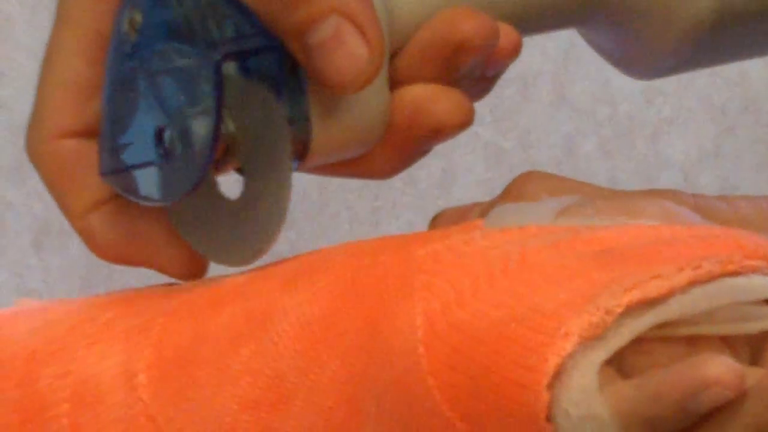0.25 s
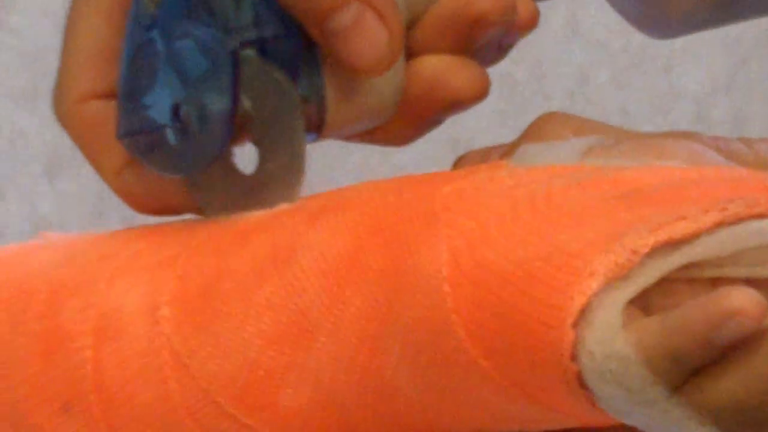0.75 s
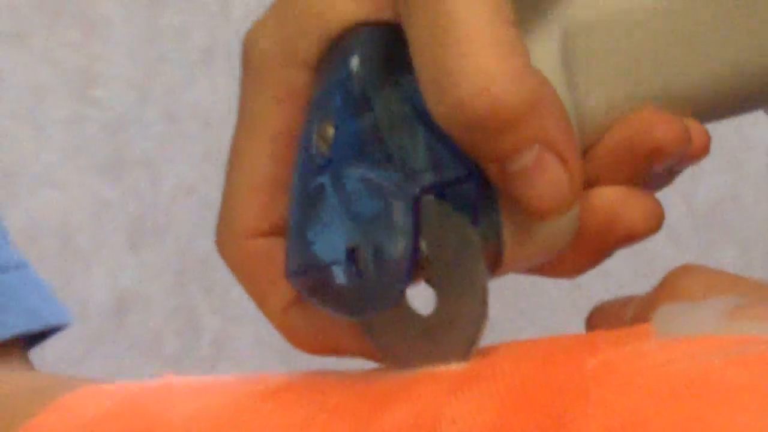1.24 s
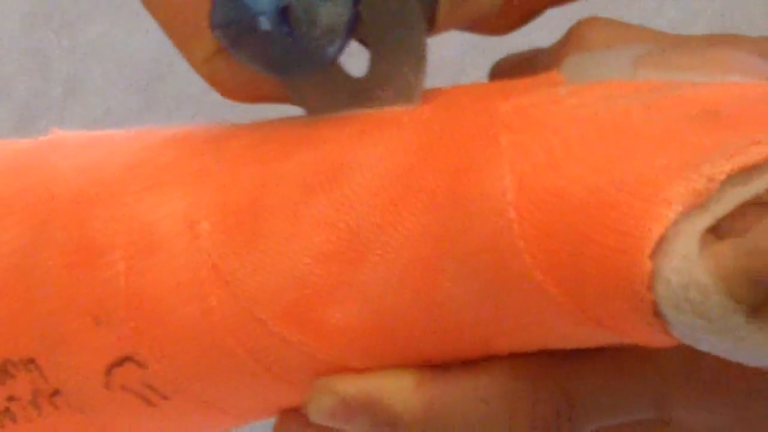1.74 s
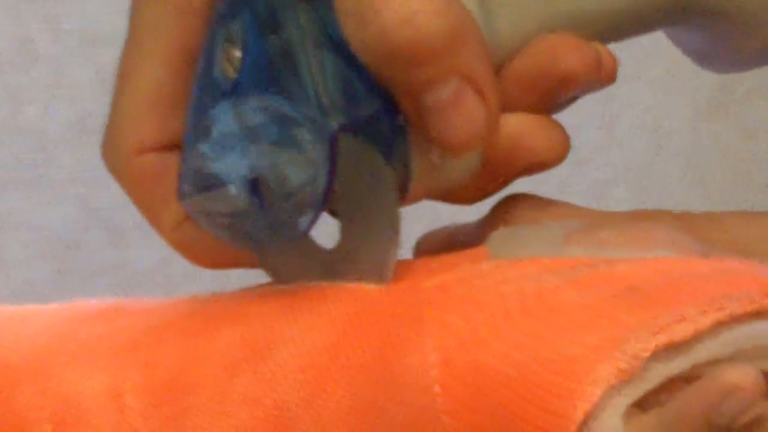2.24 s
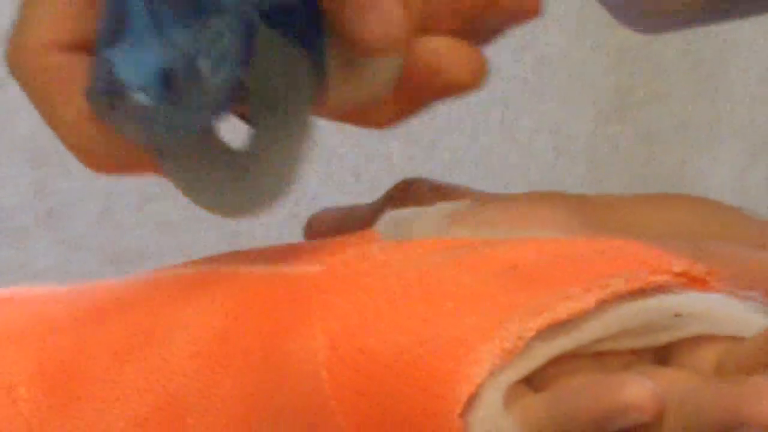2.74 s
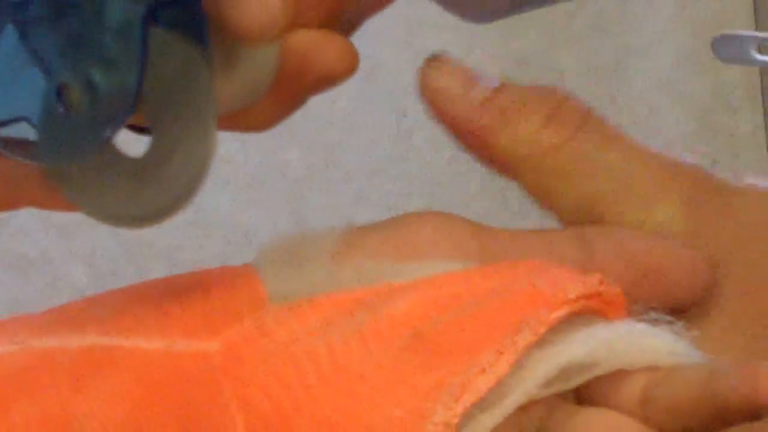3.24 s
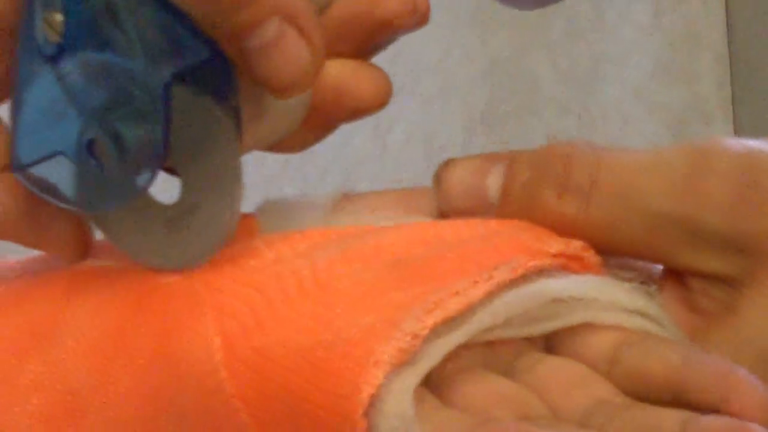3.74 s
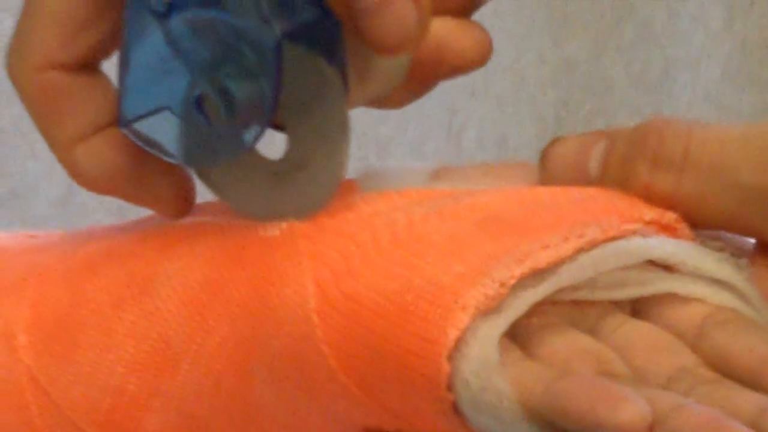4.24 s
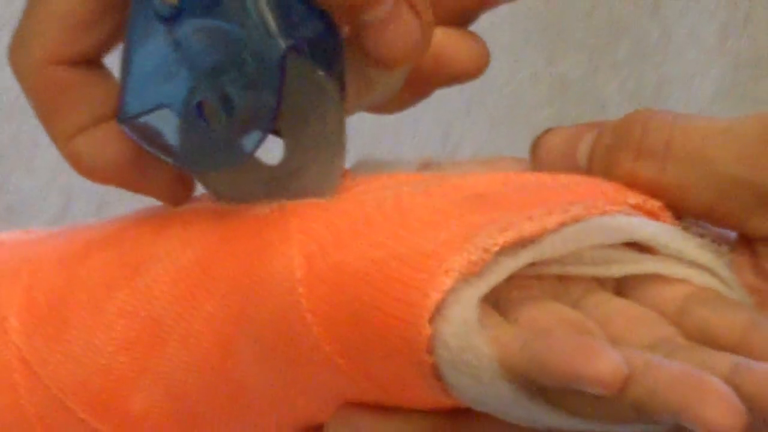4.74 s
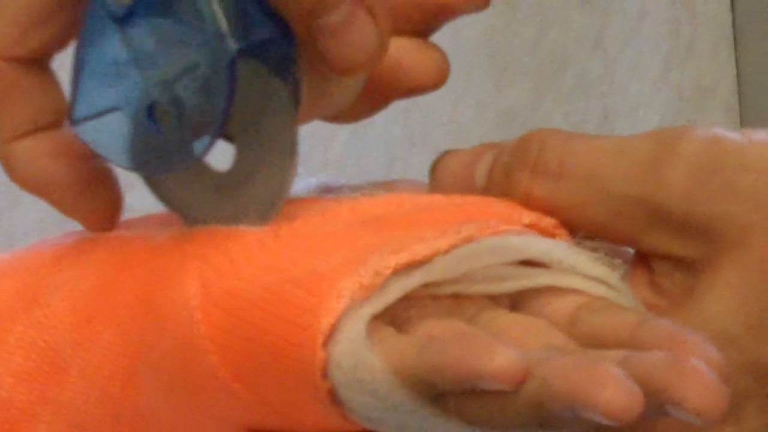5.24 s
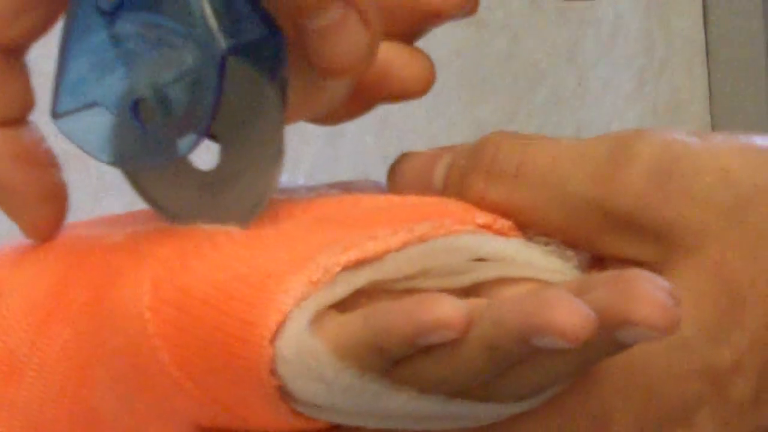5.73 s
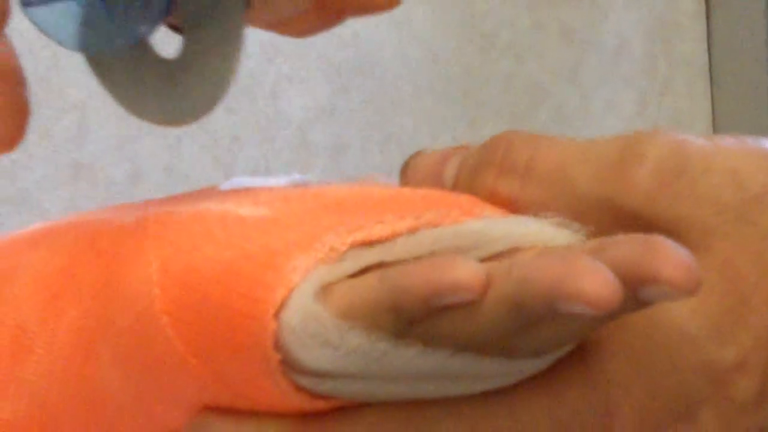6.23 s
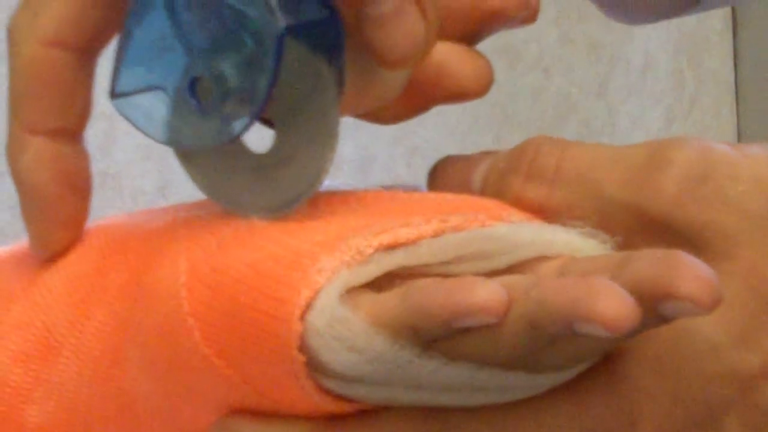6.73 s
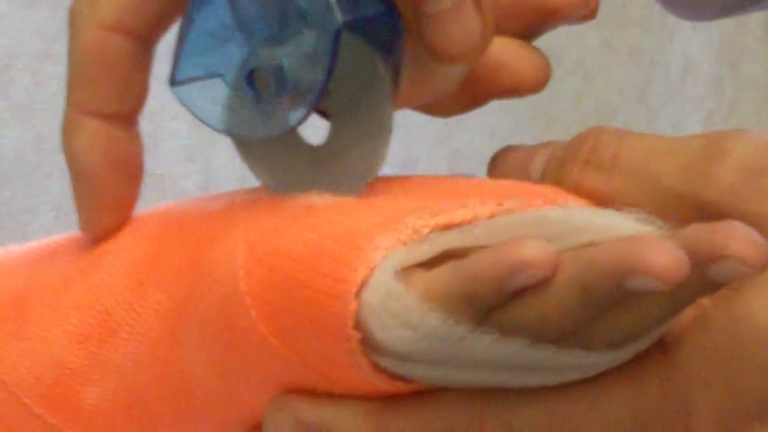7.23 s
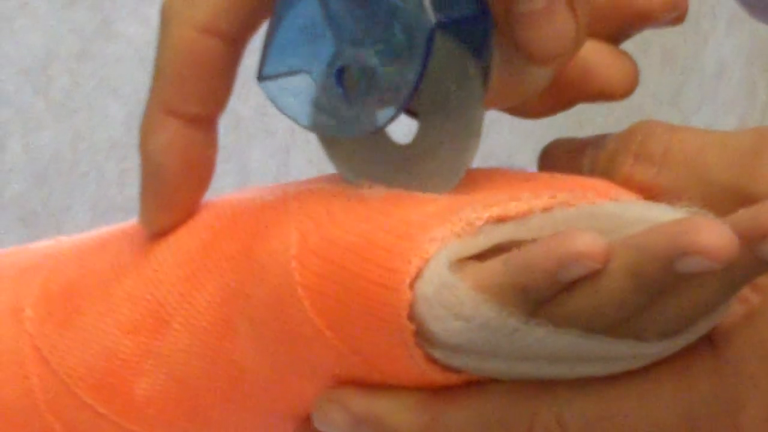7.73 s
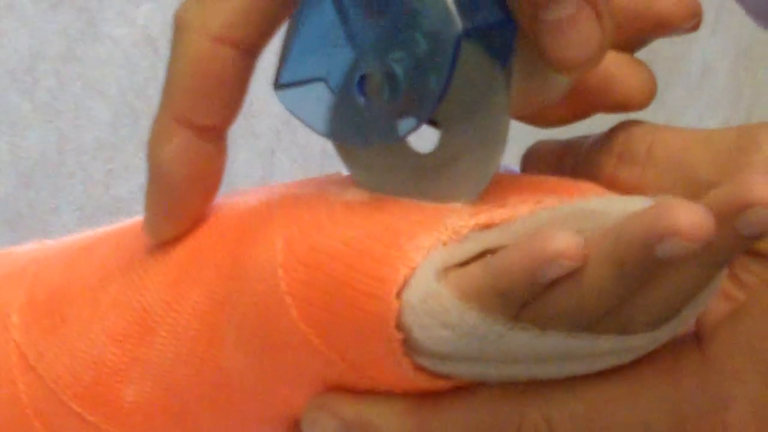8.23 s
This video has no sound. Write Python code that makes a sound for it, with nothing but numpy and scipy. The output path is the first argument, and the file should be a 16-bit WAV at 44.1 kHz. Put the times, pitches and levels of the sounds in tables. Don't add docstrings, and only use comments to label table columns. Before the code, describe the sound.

A small electric cast saw whines with a harsh nasal buzz, dipping and roughening as it bites a hard cast, vacuum air rushing underneath.

```python
import sys
import numpy as np
from scipy import signal
from scipy.io import wavfile
from scipy.ndimage import uniform_filter1d

SR = 44100
rng = np.random.default_rng(int(sys.argv[2]) if len(sys.argv) > 2 else 0)


def file_out(sig):
    cols = np.atleast_2d(sig).T
    lim = np.clip(cols, -1, 1)
    pcm = np.round(lim * 32767).astype(np.int16)
    wavfile.write(sys.argv[1], SR, pcm)


def nominal_scale(level):
    x = np.asarray(level, float) / 20
    return 10 ** x


N = 373729
MID_WHINE_DB = -39.5


def rms_one(x):
    return x / np.sqrt(np.mean(np.abs(x) ** 2) + 1e-20)


def in_time(rows):
    s, *columns = np.transpose(rows)
    return [np.interp(np.arange(N) / SR, s, c) for c in columns]


def bells(events):
    clock = np.arange(0, N + 64, 64) / SR
    coarse = 0
    for s, half_s, *more in events:
        coarse = coarse + np.outer(more, np.exp(-((clock - s) / half_s) ** 2))
    return np.array([np.interp(np.arange(N) / SR, clock, row) for row in coarse])


def drift(rate_hz):
    r = np.exp(-80 * np.pi * rate_hz / SR)
    noise = rng.standard_normal(N // 40 + 2002)
    slow = signal.lfilter([1], [1, -2 * r, r * r], noise)[2000:]
    return np.interp(np.arange(N) / 40, np.arange(len(slow)), rms_one(slow))


def highpass(x, order, hz):
    return signal.sosfilt(signal.butter(order, hz, "high", fs=SR, output="sos"), x)


def colour(sources, spectrum, low_hz, high_hz, patchy_db):
    out, together = 0, drift(10.0)
    spectrum_hz, spectrum_db = np.transpose(spectrum)
    edges = low_hz * 2 ** np.arange(0, np.log2(high_hz / low_hz), 1 / 3)
    for k, (low, high) in enumerate(zip(edges, edges[1:])):
        band = signal.sosfilt(signal.butter(2, [low, high], "band", fs=SR, output="sos"), sources[k % 2])
        level_db = np.interp(np.log(np.sqrt(low * high)), np.log(spectrum_hz), spectrum_db)
        flicker = 0.85 * together + drift(11.7) + 0.69 * drift(0.99)
        out = out + band * nominal_scale(level_db + patchy_db * flicker)
    return rms_one(out)


def partial(phase, level_db, flutter, wander_db, rate_hz):
    gain = nominal_scale(level_db + wander_db * drift(1.0)) * np.sqrt(2 / (1 + 2 * flutter ** 2))
    in_phase = (1 + flutter * drift(rate_hz)) * np.sin(phase)
    return gain * (in_phase + flutter * drift(rate_hz) * np.cos(phase))


# start_s (centre), half_s, speed_lost_hz, multiple_6_db, multiple_8_db
PUSHES = [(0.69, 0.039, 2, -6, 2), (1.38, 0.052, 1.6, 10.5, 11), (1.475, .035, 0, -7, -5),
          (1.56, 0.051, 5, 0, 10.5), (1.873, 0.046, 1.1, 5, 3), (2.0, 0.043, 1.23, -2, 1),
          (2.218, 0.059, 3.5, 2, 9), (2.3, 0.022, 0, -1, 5.5), (2.46, 0.028, 1.28, 4.5, 3),
          (2.623, 0.026, -0.4, 4, 6), (2.74, 0.067, 6, 3.5, 7), (4.69, 0.045, 0.23, 1.5, -12),
          (4.79, 0.035, 0.5, -6, -6), (4.89, 0.044, 1.5, 8, 4), (5.17, 0.042, -0.96, 8, -4),
          (5.53, 0.042, 2, -7, 9), (5.661, 0.052, -0.27, 6, -14), (5.8, 0.0557, -1.07, -0.5, -11),
          (5.989, 0.04, 1.23, 4.5, 11), (6.92, 0.066, 2.5, -8, -6), (7.601, 0.048, -1.5, -3.5, -12),
          (7.71, 0.035, 1, 4, 8), (7.899, 0.042, -1, 0.5, 7), (7.999, 0.059, 1.5, 2.5, 4),
          (8.271, 0.04, 0.7, -4, -13)]


def pushes():
    return bells(PUSHES)


# start_s, speed_hz
SPEED = [(0.0, 258.7), (0.63, 259.2), (0.83, 243.5), (1.2, 243.1), (1.45, 238), (2.05, 247.4),
         (2.65, 247.2), (3.05, 257.3), (3.5, 260.4), (4.38, 258.6), (4.58, 250.2), (4.85, 245.5),
         (6.1, 246.6), (6.35, 255.8), (6.6, 258.1), (7.3, 256.4), (7.7, 249.7), (8.47, 246.5)]
# start_s (centre), half_s, speed_lost_hz (negative: faster)
SPEED_DIPS = [(0.61, 0.055, 1.47), (1.09, 0.06094, -1.35), (1.37, 0.061, -1.43), (1.53, 0.065, 0.78),
              (1.69, 0.13, 1.14), (2.33, 0.064, 1.64), (2.85, 0.058, 0.55), (2.89, 0.092, 3),
              (2.93, 0.062, -0.5), (3.05, 0.063, 1), (3.45, 0.2, 0.93), (4.61, 0.061, 1.04),
              (4.77, 0.06, -0.36), (4.93, 0.088, 0.48), (5.13, 0.09, -0.5), (5.53, 0.2, -0.5),
              (5.97, 0.2, -1.77), (6.05, 0.0597, 0.82), (6.25, 0.089, -1.32), (6.57, 0.2, -0.23),
              (6.81, 0.063, 0.5), (6.93, 0.06, -0.8), (7.33, 0.062, -0.5), (7.53, 0.12, 1.85),
              (7.93, 0.21, 0.45), (8.17, 0.061, 1)]


def motor(lost_hz):
    speed_hz = in_time(SPEED)[0] - lost_hz - bells(SPEED_DIPS)[0]
    turn = 2 * np.pi * np.cumsum(speed_hz + 0.1595 * drift(15.2)) / SR
    return speed_hz, turn


# start_s, near_db (as whine level), yaw_db, tilt_db, facing_db
HOLD = [(0.0, -33.5, 1.5, -5, 2.5), (0.17, -30, -5, -6.5, 0.5), (0.43, -35, -0.5, -1.5, -0.5),
        (0.675, -31, -2, -9.5, -1), (0.705, -40, -2.5, -1.5, 0), (2.1, -51.5, -4.5, 7.5, -1),
        (2.5, -48, -6, -1.5, 2), (3.1, -38, -0.5, -0.5, -1.5), (3.63, -40, -6, -1.5, 1.5),
        (4.0, -44, -4, 0.5, 0), (4.42, -35.5, 6, -9.5, 0), (4.6, -43, -6.5, 0, 0.5),
        (5.3, -37, -1, -6.5, -0.5), (6.1, -39, -5.5, -4, 1), (6.6, -41.5, 4, -4, 1),
        (7.1, -40.5, -2.5, -2.5, 3), (7.4, -41.5, -1.5, -3.5, 1.5), (8.3, -35, -14, -12, -0.5)]
# start_s (centre), half_s, near_db, yaw_db, tilt_db
WOBBLES = [(.61, 0.015, 2, 0, -8), (.64, 0.018, -1.5, 5, 5.5), (.73, 0.076, 0, -7, -7),
           (.85, .04, -12, -8, 5), (1.17, 0.043, -14.5, 5.5, 10.5), (1.4, 0.056, 8, -8, -8),
           (1.57, 0.043, -13, -4, 6), (1.69, 0.053, 8, -6, -13.5), (1.9, 0.073, -14.5, -26, 1.5),
           (2.28, 0.037, -12, -16, 1), (2.45, 0.039, 4, .3, -10), (2.6, 0.044, 7.5, -6, -2),
           (2.71, 0.053, -7, 12, 0), (2.94, 0.081, 2.5, -1, 0), (3.29, 0.078, 1.8, 3, -5.5),
           (4.45, 0.043, 2.5, -7, 3.5), (4.57, 0.03, -4, 2, 4), (4.68, 0.052, 1.5, -12, -7),
           (4.77, .03, 0.5, 14, 0), (4.98, 0.14, -3, -12, 0.5), (5.45, .04, -5, -11, 2),
           (5.84, 0.033, -9, -6, 7), (6.2, 0.047, -12.5, 4, 13), (6.37, 0.074, 2, -1, 2),
           (7.56, .09, -9, 1, 9), (7.94, 0.028, -7, 9, 4)]


def grip():
    *held, facing_db = in_time(HOLD)
    near_db, yaw_db, tilt_db = held + bells(WOBBLES)
    return held[0], near_db, yaw_db, tilt_db, facing_db


# start_s (centre), half_s, rasp_db, hum_db, facing_db
PATCHES = [(0.0, 0.035, 3, 3, 0), (.68, 0.17, 2, 2.5, 2), (.91, 0.054, 3, -2.5, -1),
           (1.14, 0.036, 2.5, 4.5, 1.7), (1.5, 0.066, 4.5, 1.5, 0), (1.59, 0.041, 0.5, -5, 2),
           (1.97, 0.043, -1.5, 0, 1), (2.17, 0.049, 1.5, 2, -1), (2.35, 0.044, -6, -3.5, -0.5),
           (2.69, 0.064, 1.5, 1, -2), (2.86, 0.046, 1, -2, 1), (3.25, 0.13, 0, -1.5, 1.5),
           (3.79, 0.053, -2, -5, -5), (4.62, 0.082, 1.5, 3, -3), (4.81, 0.037, 1.5, 5, 1.7),
           (5.42, 0.16, 3, 1.5, 1.5), (5.8, 0.054, -1, -2.5, 0), (6.94, 0.052, -10, -3, -4.5),
           (7.04, 0.029, 3, -2, -0.5), (7.29, 0.039, -2.5, -2, 0), (7.85, 0.037, -1.5, -1.5, -3)]


def patches():
    return bells(PATCHES)


# start_s, multiple_6_db, multiple_8_db (relative to 6), weave_feed_db
CAST = [(0.0, -53, 0.5, -2), (0.12, -43, -4, 1.5), (0.46, -47.5, -6, -3), (0.62, -37, -5, 1),
        (1.25, -38, -11, 0.6), (1.72, -35, -5.5, 3), (1.8, -44, 2.5, 1.3), (2.75, -40, -4, 0),
        (2.87, -50, -3, -3.5), (3.15, -42, -7, -0.5), (4.35, -51, 2, -0.7), (4.55, -35.5, -8, 2.5),
        (5.1, -40, -0.5, 0.5), (6.05, -36, -14, -0.5), (6.2, -48, -3, -0.5), (7.3, -50, 3, 1),
        (7.48, -37, -13, -0.6), (8.47, -34, -3, -0.5)]


def cast():
    return in_time(CAST)


# start_s (centre), half_s, multiple, level_db
GLINTS = [(0.05, 0.4, 13.0, -7.0), (0.09, 0.15, 27.0, -19), (0.21, 0.43, 19.0, 7), (0.21, 0.53, 15.0, 5.5),
          (0.29, 0.28, 31.0, 6), (0.328, 0.12, 17.0, 8), (0.33, 0.15, 22.0, -9.0), (0.81, 0.17, 26.0, -3),
          (0.97, 0.15, 24.0, -9.0), (1.25, 0.13, 15.0, 11), (1.45, 0.4, 31.0, -5.0), (1.49, 0.13, 26.0, -7),
          (1.49, 0.23, 24.0, -13), (1.53, 0.15, 22.0, 14.0), (1.61, 0.4, 23.0, -4.0),
          (2.01, 0.85, 27.0, 5.5), (2.05, 0.15, 29.0, 4), (3.01, 0.27, 17.0, -4), (3.21, 0.43, 13.0, 4.5),
          (3.331, 0.26, 29.0, -8.0), (3.451, 0.14, 18.0, 7), (3.45, 0.47, 32.0, -11),
          (3.49, 0.28, 22.0, 12), (3.73, 0.15, 15.0, -11.0), (3.73, 0.7, 27.0, 2.5), (3.85, 0.39, 20.0, -9),
          (4.25, 0.45, 29.0, 5), (3.45, .25, 47.5, 8), (4.61, 0.23, 26.0, -4), (5.45, 0.25, 31.0, 11),
          (5.65, 0.4, 23.0, 5), (5.929, 0.58, 26.0, 5.5), (5.97, 0.72, 41.0, 7.0), (6.65, 0.15, 23.0, 2),
          (6.81, 0.4, 19.0, -14), (6.811, 0.39, 35.0, 6.0), (6.89, 0.35, 33.0, 3), (7.01, 0.37, 27.0, -6),
          (7.21, 0.15, 13.0, -8.0), (7.21, 0.25, 20.0, 7.0), (7.57, 0.4, 31.0, -7), (7.89, 0.6, 13.0, -7),
          (7.97, 0.51, 24.0, 6), (8.17, 0.6, 28.0, 0)]
GLINT_WIDTH = 0.97


def glint(k):
    near_k = []
    for s, half_s, centre, db in GLINTS:
        near_k.append((s, half_s, db * np.exp(-((k - centre) / GLINT_WIDTH) ** 2)))
    return bells(near_k)[0]


# multiple, offset_db, yaw_share, tilt_share, facing_share
LOBES = [(5, 1.36, 0.11, 0.16, 0.01), (7, 2, 1.05, 1.28, 0.05), (9, 1.44, -0.44, 1.2, 0.061),
         (11, -8, 0.078, 0.6, 3.4), (13, -12.5, 0.22, 0.14, 0.6)]
NULL_HZ, NULL_WIDTH_HZ, NULL_DB = 1253.7, 11, -6
NEAR_ON_UPPER = 0.32
CHATTER_DB, CHATTER_HZ = 1.6, 5


def housing(speed_hz, load, near_db, yaw_db, tilt_db, facing_db):
    for k, offset_db, yaw, tilt, facing in LOBES:
        near = (near_db - MID_WHINE_DB) * (1 if k < 10 else NEAR_ON_UPPER)
        aimed_db = near + yaw * yaw_db + tilt * tilt_db + facing * facing_db
        hole_db = NULL_DB * np.exp(-((k * speed_hz - NULL_HZ) / NULL_WIDTH_HZ) ** 2)
        chatter_db = CHATTER_DB * load * drift(CHATTER_HZ)
        yield k, MID_WHINE_DB + offset_db + aimed_db + hole_db + glint(k) + chatter_db


SPREAD_RAD = 0.255


def knock_phase(k, turn, load):
    return k * turn - SPREAD_RAD * k ** 2 + rng.uniform(-np.pi, np.pi) * (1 - load)


def main_tones(turn, load, followed):
    out = 0
    for k, level_db in followed:
        flutter = k * (.004 + .010 * load) + .05
        out = out + partial(knock_phase(k, turn, load), level_db, flutter, wander_db=.3, rate_hz=30)
    return out


# multiple, free_db, cutting_db
LOW_ORDERS = [(3, -52.5, -54), (4, -76, -59.5), (10, -53.5, -49), (12, -60.5, -52.5)]
# start_s (centre), half_s, multiple_3_db, multiple_10_db, multiple_12_db
RATTLES = [(0.37, 0.35, 4.0, 4, 3.0), (0.85, 0.11, -9, 1, -3.0), (1.09, 0.065, -9, -4, -4),
           (1.13, 0.3, 2, 5.0, -7), (1.25, 0.08, -1.5, -5, -4.0), (1.41, 0.08, 4, 1, 5),
           (1.57, 0.14, -9, 1, 3), (1.61, 0.3, 3, 7, 3), (1.81, 0.072, 1, -1, -8.0),
           (1.93, 0.083, -6, 3, 1), (2.09, 0.08, -1, -8, 2.0), (2.13, 0.27, 4.5, -7, -9.0),
           (2.61, 0.071, 4, -4.0, 2.0), (2.89, 0.2, -0.5, 1, -8), (3.13, 0.11, -10, -9, -1),
           (3.25, 0.086, 1.0, 3, 5.0), (3.41, 0.24, 2.5, 5.0, 11), (3.85, 0.2, 4, 5, -3),
           (4.53, 0.11, -13.0, -8.0, 9.5), (4.97, 0.076, 0, 3, 6), (5.21, 0.3, 1.5, 5.5, 4.5),
           (5.93, 0.28, -1.5, -1, 8.5), (6.37, 0.13, -2.5, 3, 5), (6.65, 0.081, 0, -8, 2.0),
           (6.93, 0.082, 4, -3, 6), (7.17, 0.08, 2, 5, -4.0), (7.21, 0.3, -4, -7.0, 4),
           (7.61, 0.08, -6, -2, 1), (8.13, 0.28, 0.5, -5, 6)]
# start_s (centre), half_s, level_db
FLEXES = [
    (.77, 0.14, 16),
    (1.09, .08, -9),
    (1.482, .2, 15),
    (1.81, 0.089, 6),
    (5.57, .12, 8),
    (5.929, .2, -15),
    (7.73, .2, -6),
    (8.33, .2, -10),
]


def guard_and_flex(turn, load):
    out = 0
    on3, on10, on12 = bells(RATTLES)
    for (k, free, cut), more_db in zip(LOW_ORDERS, [on3, bells(FLEXES)[0], on10, on12]):
        level_db = free + load * (cut - free) + more_db
        flutter = .17 + .15 * load + k * (.007 + .011 * load)
        out = out + partial(knock_phase(k, turn, load), level_db, flutter, wander_db=.4, rate_hz=25)
    return out


# multiple, free_db, cutting_db
HIGH_ORDERS = [(14, -54.5, -52.5), (15, -57.5, -58), (16, -54, -51.5), (17, -51, -51), (18, -56.5, -51.5),
               (19, -57.5, -57), (20, -64, -56), (21, -65.5, -66), (22, -58.5, -68), (23, -49.5, -68),
               (24, -51, -55), (25, -49, -54), (26, -50, -52.5), (27, -55.5, -58.0), (28, -56, -57.5),
               (29, -64, -59.5), (30, -61.5, -69.0), (31, -71, -68.6), (32, -79, -73), (33, -81, -72.9),
               (34, -74, -69), (35, -75, -73), (36, -70, -69), (37, -68.5, -75), (38, -67, -67.5),
               (39, -70, -75), (40, -74, -72), (41, -76.9, -71), (42, -79, -73), (43, -81.8, -83.1),
               (44, -80.6, -83.7), (45, -82.8, -88.7), (46, -78, -84.9), (47, -88.2, -85.5), (48, -78, -73),
               (49, -92.6, -86.5)]


def upper_tones(turn, load, facing_db):
    out = 0
    for k, free, cut in HIGH_ORDERS:
        beam_db = facing_db * np.clip((k - 14) / 8, 0, 1)
        level_db = free + load * (cut - free) + glint(k) + beam_db
        phase = k * turn + rng.uniform(0, 2 * np.pi)
        out = out + partial(phase, level_db, k * (.019 + .045 * load), wander_db=1.0, rate_hz=38)
    return out


def grit(turn, per_s, spread_db, depth):
    stroke = np.clip(1 + depth * (np.cos(turn) + 0.75 * np.cos(2 * turn + 1.0)), .05, None)
    sizes = nominal_scale(spread_db * np.minimum(rng.exponential(1, (2, N)), 5)) * rng.choice([-1, 1], (2, N))
    return stroke * sizes * (rng.random((2, N)) < per_s / SR)


# pitch_hz, density_db (per Hz)
RASP = [(250, -9.5), (550, -17), (750, -4.5), (1000, -2.5), (1400, 3), (2100, 5), (2700, -4), (4000, 0),
        (5000, -17), (7000, -31)]


def rasp(turn, level_db):
    contacts = grit(turn, per_s=9000, spread_db=2.8, depth=0.25)
    return nominal_scale(level_db) * colour(contacts, RASP, 217.4, 8000, patchy_db=1.03)


# pitch_hz, density_db (per Hz)
HISS = [(3000, -9), (5000, 3), (6500, 5), (7500, -6.5), (8500, -16), (9300, -11), (10300, -16),
        (12000, -22.5), (13000, -30), (15500, -32)]
# start_s, level_db
DUST = [(0, 1), (.5, 1.5), (.75, 0.3), (2.6, 0.5), (3.05, -0.5), (3.9, 2.5), (4.2, 1.5), (5.4, 1.5),
        (6.6, 1.5), (6.87, 2), (6.98, 1), (8.47, 1)]
# start_s (centre), half_s, level_db
VENTS = [
    (3.45, 0.24, 5),
    (3.94, .07, 3),
    (5.3, .4, 3),
]


def hiss(turn, level_db):
    contacts = grit(turn, per_s=20000, spread_db=2.5, depth=0.4)
    out = colour(contacts, HISS, 2688, 17000, patchy_db=-0.1)
    out = out + (nominal_scale(bells(VENTS)[0]) - 1) * highpass(out, 2, 9500)
    return nominal_scale(level_db + in_time(DUST)[0] + 3.5) * out


# pitch_hz, density_db (per Hz)
AIR = [(20, 8), (40, -4), (70, -5), (150, -12), (300, -6), (550, -8), (800, 0.5), (1500, -5), (3000, -0.5),
       (6000, -23), (15000, -47)]
# pitch_hz, level_db, width_hz
VACUUM = [(313.2, -61, 6.8), (704, -61.5, 3), (938.6, -53.5, 1.5), (1144, -58, 3.7), (1890, -59, 5)]
AIR_DB = -46


def vacuum():
    out = nominal_scale(AIR_DB) * colour(rng.standard_normal((2, N)), AIR, 13.52, 16000, patchy_db=1.0)
    clock = 2 * np.pi * np.arange(N) / SR
    for hz, db, width_hz in VACUUM:
        out = out + partial(hz * clock, db, .3, wander_db=.6, rate_hz=width_hz)
    return out


# multiple, level_db
BEARING = [(5.08, -62), (6.43, -62), (8.42, -60), (10.71, -65), (15.37, -65), (16.78, -58)]


def bearing(turn, load):
    return sum(partial(k * turn, db - 4 * load, 0.27, wander_db=3.0, rate_hz=10) for k, db in BEARING)


# touch_s, bite_s, leave_s, thump_at_bite_db, thump_at_end_db (multiple 2)
CUTS = [
    (0.57, 0.684, 2.82, -51.5, -57.5),
    (4.45, 4.607, 6.3, -53.5, -47.5),
    (7.4, 7.658, 8.6, -50.5, -53),
]
LEAVE_S, THUMP_FREE_DB = 0.066, -60.5


def contact():
    clock, inside, thump_db = np.arange(N) / SR, 0, THUMP_FREE_DB
    for touch, bite, leave, first_db, last_db in CUTS:
        out = (leave - clock) / LEAVE_S + .5
        inside = inside + np.clip(np.minimum((clock - touch) / (bite - touch), out), 0, 1)
        deep = np.clip(np.minimum((clock - bite) / LEAVE_S + .5, out), 0, 1)
        bitten_db = np.interp(clock, [bite, leave], [first_db, last_db])
        thump_db = thump_db + deep * (bitten_db - THUMP_FREE_DB)
    return inside, thump_db


# pitch_hz, t60_s, level_db
SHELL = [(750, 0.033, -13), (961, 0.12, -3), (1360, 0.028, 6), (1880, .01, -3), (2440, .008, -5),
         (3900, .005, -14)]
# start_s, peak_db
SNAGS = [(0.807, -29), (.822, -21), (1.19, -14), (1.449, -14), (1.467, -9), (1.479, -21), (1.483, -5.5),
         (1.487, -11), (1.501, -7), (1.528, -16.5), (1.744, -12.5), (2.154, -20), (2.213, -20),
         (2.617, -22), (2.63, -27), (2.694, -26), (4.811, -27), (5.057, -18), (5.51, -18), (7.662, -25),
         (7.695, -19), (8.41, -16.5)]


def snags():
    at, out = [round(s * SR) for s, db in SNAGS], np.zeros(N)
    strengths_db = rng.normal(0, 0.8, (len(at), len(SHELL)))
    for m, (hz, t60_s, level_db) in enumerate(SHELL):
        clicks = np.full(N, 1e-18)
        clicks[at] = nominal_scale(np.array(SNAGS)[:, 1] + level_db - 19.0 + strengths_db[:, m])
        r, w = nominal_scale(-60 / (t60_s * SR)), 2 * np.pi * hz / SR
        out += signal.lfilter([0, np.sin(w)], [1, -2 * r * np.cos(w), r * r], clicks)
    return highpass(out, 4, 620)


# start_s (centre), half_s, level_db
SURGES = [(1.15, 0.016, -2.5), (1.28, 0.033, -1.7), (2.07, 0.026, 1.5), (2.73, 0.014, -1), (2.91, .015, 2),
          (2.96, .025, -1.9), (5.21, .025, 2), (5.36, 0.022, -1.5), (5.45, 0.014, -2), (6.88, 0.026, 2.5),
          (8.03, 0.023, -1)]
SHUDDER_DB, TREMBLE_DB = .25, .55


def surges():
    return bells(SURGES)[0] + SHUDDER_DB * drift(8.9) + TREMBLE_DB * drift(34.0)


FREE_HZ, SAG_HZ, IDLE_HZ = 254.8, 11.3, 256
SPEED_SHARE = 0.36
HUM_FREE_DB, HUM_CUT_DB, HUM_FOLLOWS_DRUM = -49, -47, 0.19
RASP_IDLE_DB, RASP_CUT_DB, RASP_DB_PER_HZ = -40, 0.5, 0.209
RASP_FOLLOWS_DRUM, RASP_FOLLOWS_NEAR, RASP_FOLLOWS_PUSH = 0.027, 0.075, 0.26
HISS_FREE_DB, HISS_CUT_DB, HISS_FOLLOWS_NEAR, HISS_FOLLOWS_FEED = -47, -45.5, -0.032, 0.27
FACING_ON_HIGH = 0.16
OFFSET, SWAY_DB = 0.0064, -62


def scene():
    lost_hz, more6_db, more8_db = pushes()
    speed_hz, turn = motor(lost_hz)
    held_db, near_db, yaw_db, tilt_db, facing_db = grip()
    weave_db, grip_db, shift_db = patches()
    drum_db, overtone_db, feed_db = cast()
    inside, thump_db = contact()
    slowed = np.clip((FREE_HZ - speed_hz) / SAG_HZ, 0, 1)
    load = np.clip(SPEED_SHARE * slowed + (1 - SPEED_SHARE) * inside, 0, 1)
    near, drum = held_db - MID_WHINE_DB, drum_db - MID_WHINE_DB

    thump_db = thump_db + grip_db + 0.8 * drift(10.0)
    hum_db = HUM_FREE_DB + load * (HUM_CUT_DB - HUM_FREE_DB) + HUM_FOLLOWS_DRUM * drum
    hum_db = hum_db + grip_db + 0.64 * drift(9.6)
    followed = [(1, hum_db), (2, thump_db), (6, drum_db + more6_db), (8, drum_db + overtone_db + more8_db)]
    followed += housing(speed_hz, load, near_db, yaw_db, tilt_db, facing_db + shift_db)
    tones = main_tones(turn, load, followed) + guard_and_flex(turn, load)
    tones = tones + upper_tones(turn, load, FACING_ON_HIGH * facing_db)

    rasp_db = RASP_IDLE_DB + RASP_DB_PER_HZ * (IDLE_HZ - speed_hz) + RASP_CUT_DB * inside
    rasp_db = rasp_db + RASP_FOLLOWS_DRUM * drum + RASP_FOLLOWS_PUSH * more6_db
    rasp_db = rasp_db + RASP_FOLLOWS_NEAR * near + feed_db + weave_db
    hiss_db = HISS_FREE_DB + load * (HISS_CUT_DB - HISS_FREE_DB)
    hiss_db = hiss_db + HISS_FOLLOWS_NEAR * near + HISS_FOLLOWS_FEED * (feed_db + weave_db)
    bite = drift(7.8)
    saw = tones + rasp(turn, rasp_db + 0.48 * bite) + hiss(turn, hiss_db + 0.75 * bite)

    mono = nominal_scale(surges()) * saw + vacuum() + bearing(turn, load) + snags()
    side = OFFSET + nominal_scale(SWAY_DB) * uniform_filter1d(drift(26), size=800)
    return np.array([mono + side, mono - side])


def band_limit(x):
    return signal.sosfilt(signal.butter(12, 15020, fs=SR, output="sos"), x)


NOTCH_HZ, NOTCH_FLOOR_HZ, NOTCH_WIDTH_HZ = 5467, 40, 2400


def record(dry):
    w = 2 * np.pi * NOTCH_HZ / SR
    zero, pole = np.exp(-np.pi * NOTCH_FLOOR_HZ / SR), np.exp(-np.pi * NOTCH_WIDTH_HZ / SR)
    b = [1, -2 * zero * np.cos(w), zero ** 2]
    a = [1, -2 * pole * np.cos(w), pole ** 2]
    return band_limit(signal.lfilter(b, a, dry) * sum(a) / sum(b))


dry = scene()
out = record(dry)
file_out(out)
```